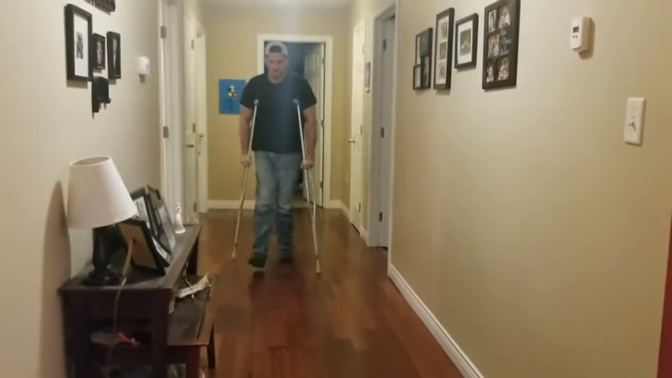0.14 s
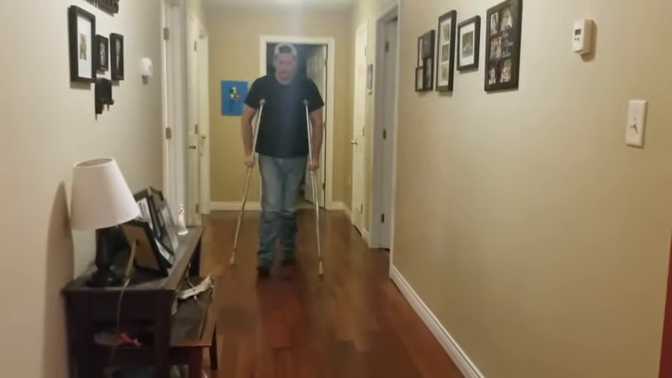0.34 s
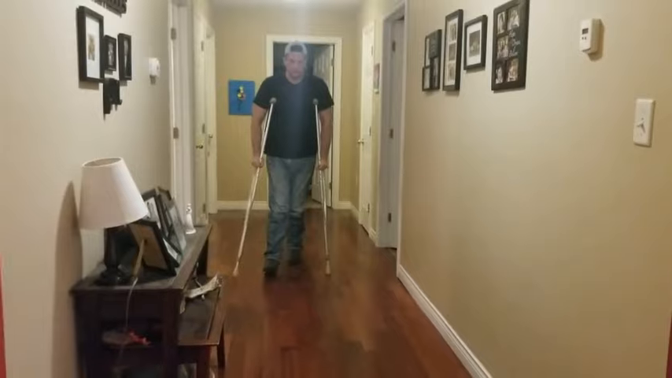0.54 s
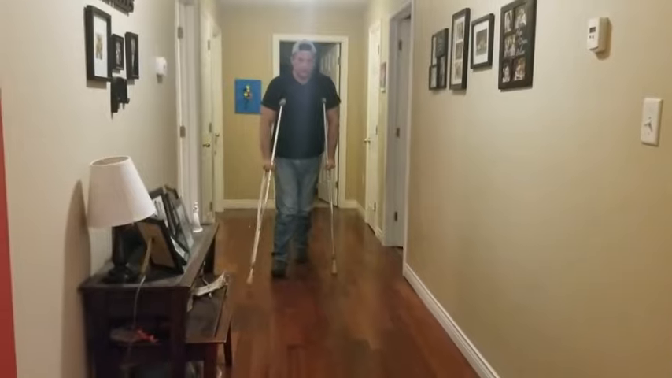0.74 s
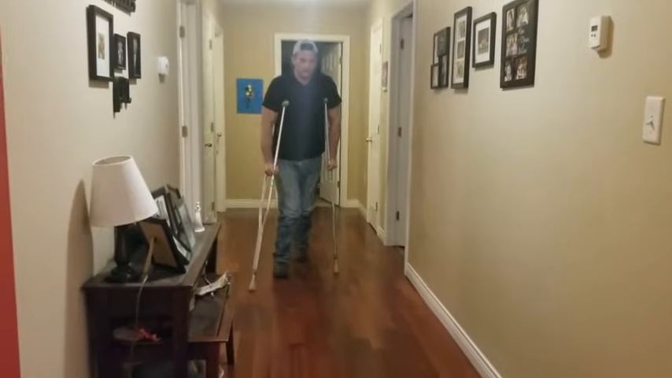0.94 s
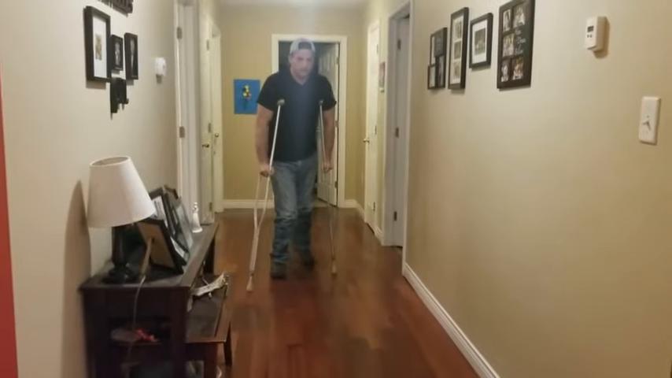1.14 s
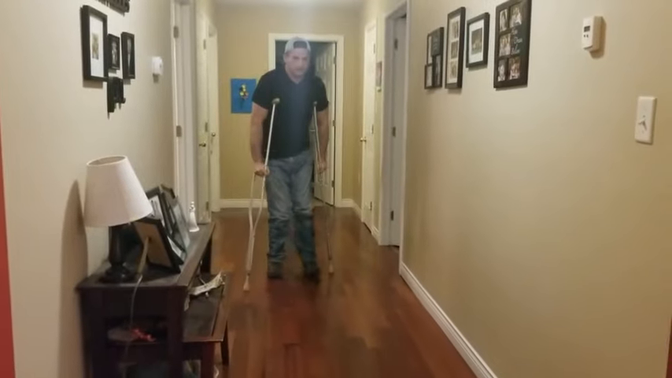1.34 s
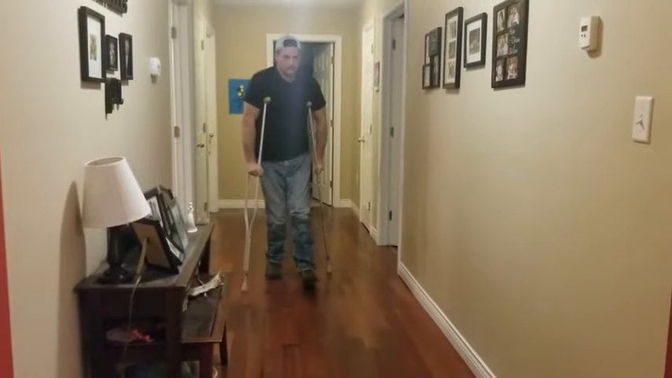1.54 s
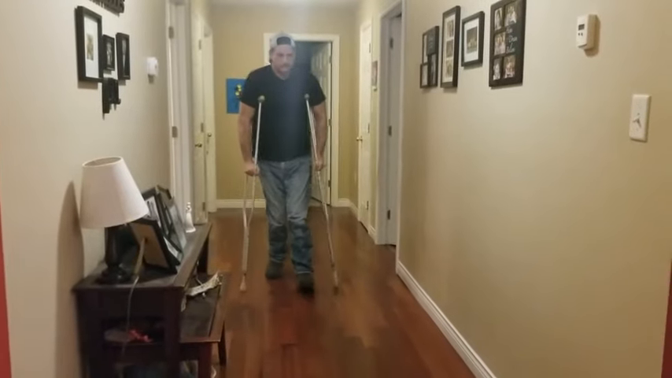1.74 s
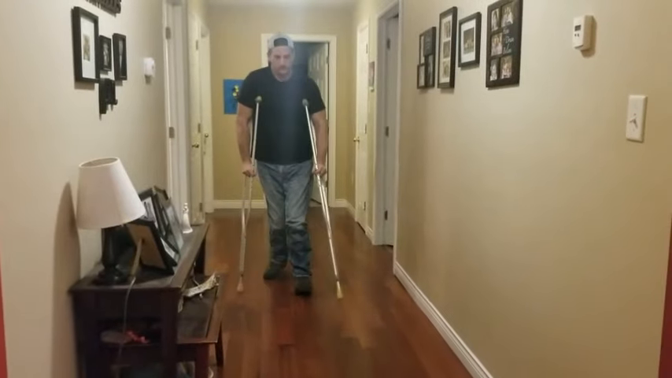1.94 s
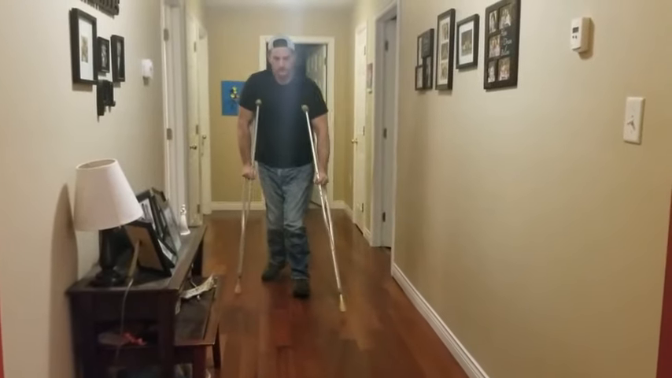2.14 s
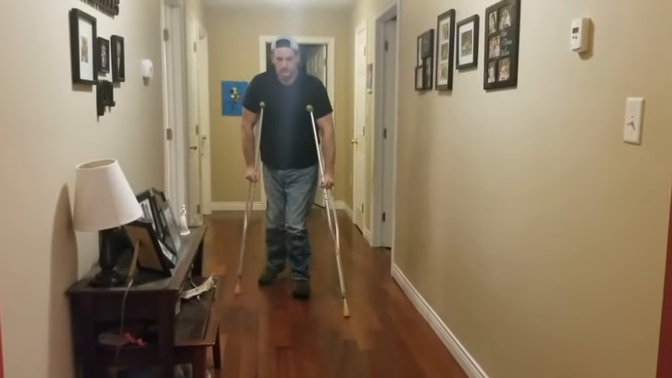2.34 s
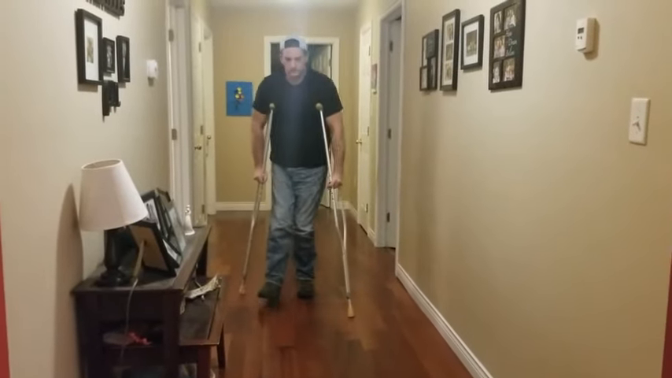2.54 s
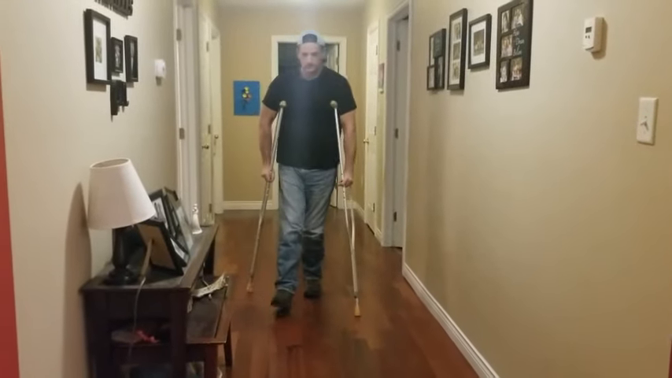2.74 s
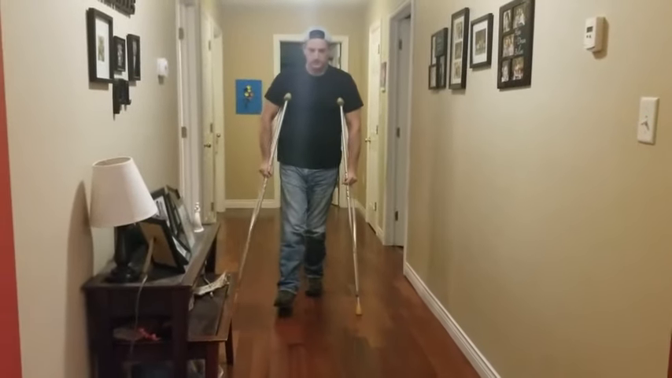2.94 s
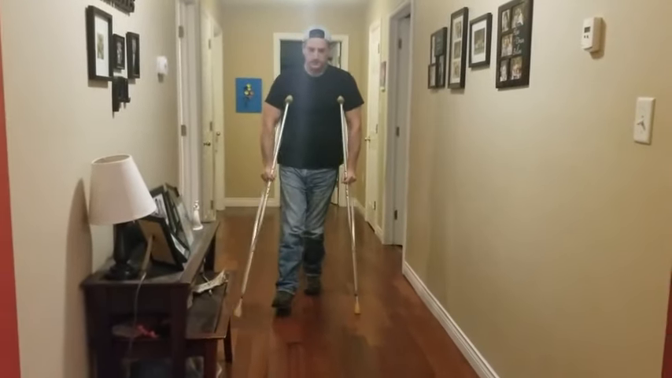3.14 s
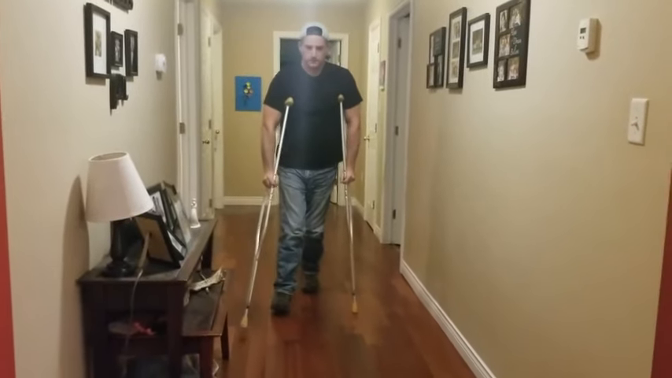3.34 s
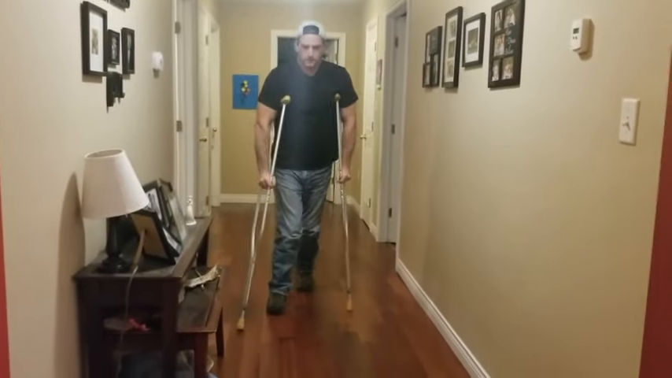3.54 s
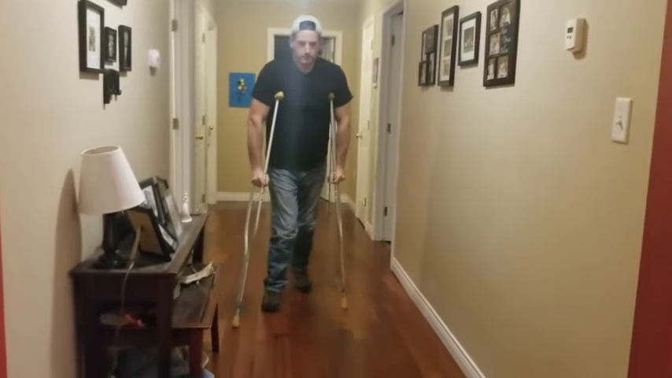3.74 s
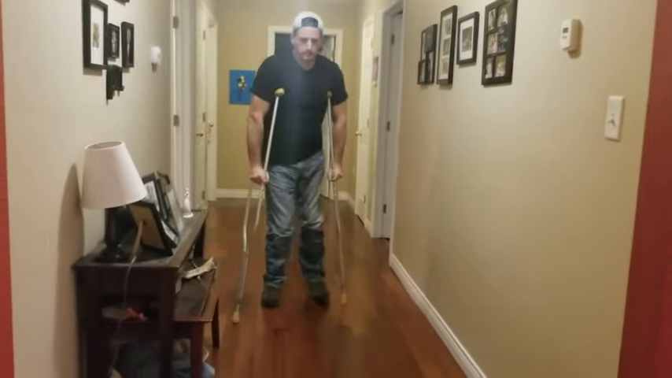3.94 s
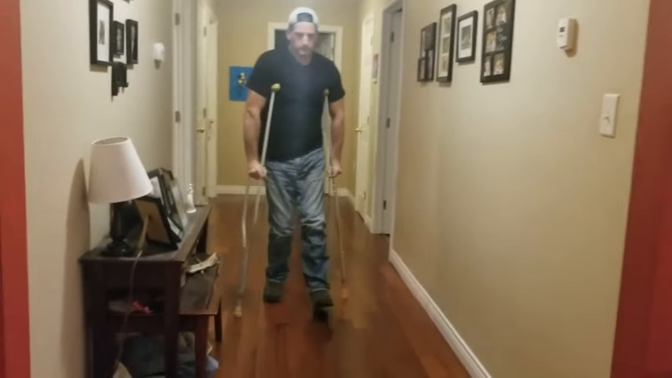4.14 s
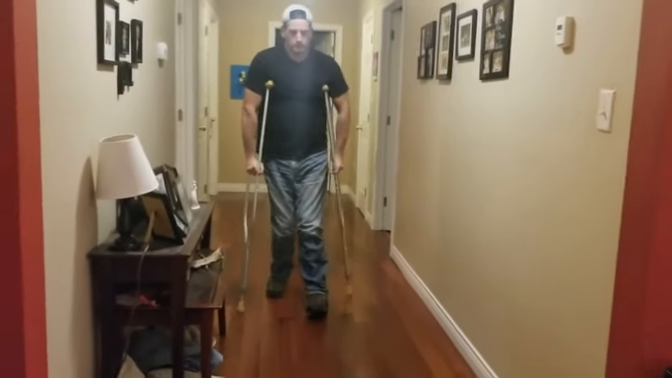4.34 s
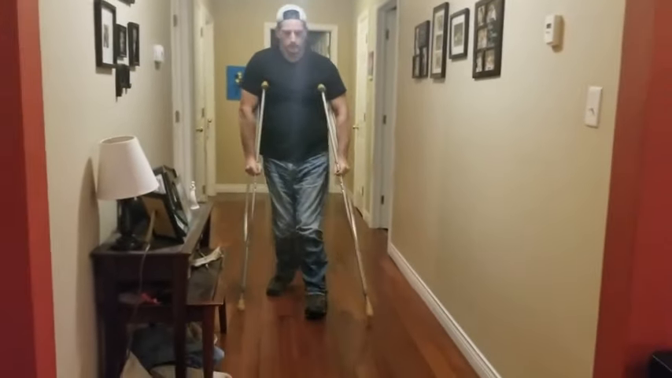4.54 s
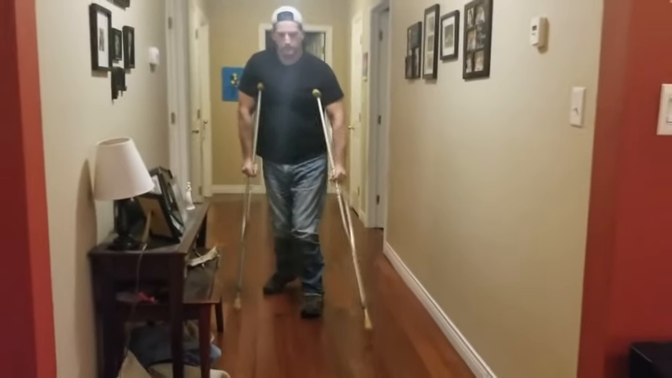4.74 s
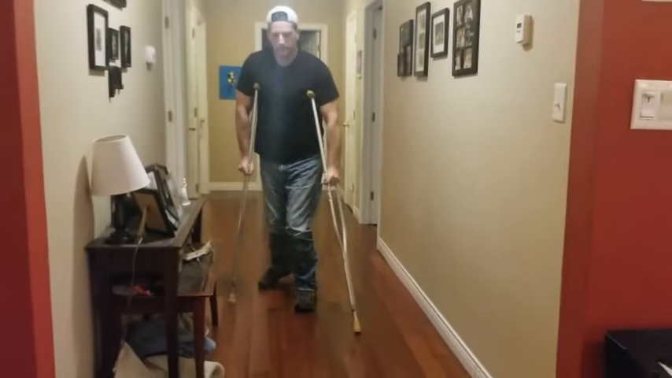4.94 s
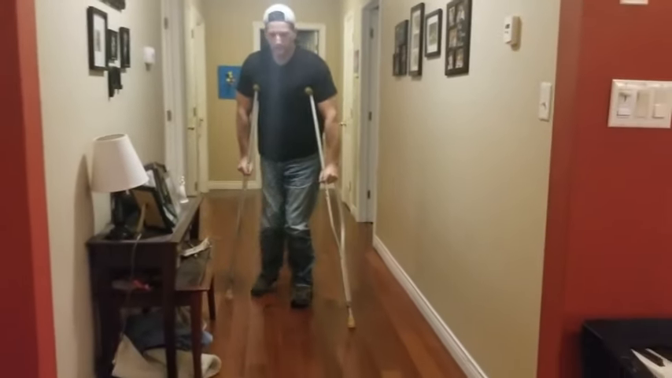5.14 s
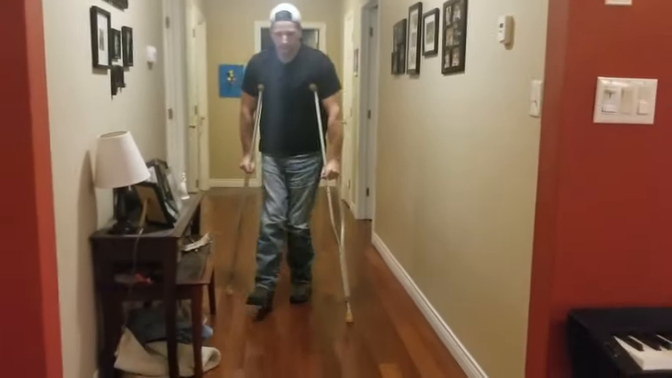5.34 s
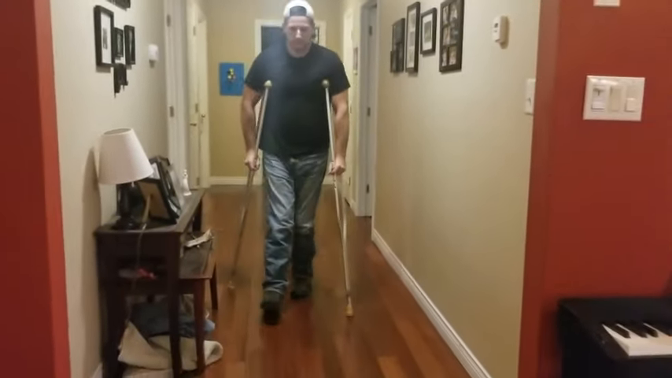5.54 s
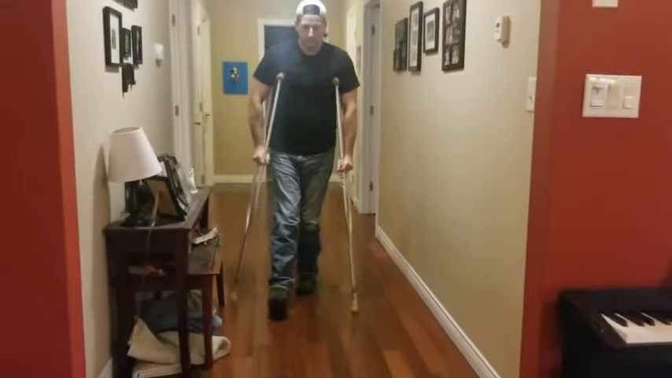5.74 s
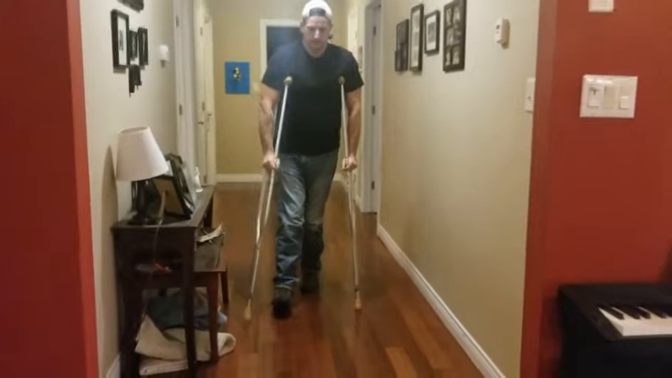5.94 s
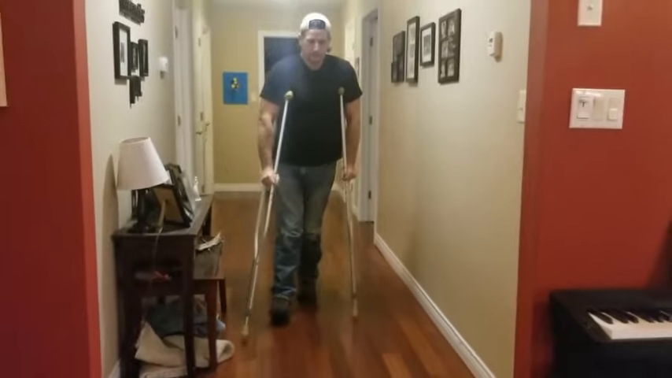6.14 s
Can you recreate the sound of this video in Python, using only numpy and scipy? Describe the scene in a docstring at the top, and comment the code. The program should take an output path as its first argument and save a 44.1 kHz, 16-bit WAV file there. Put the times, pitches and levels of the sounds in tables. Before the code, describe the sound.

Slow, uneven crutch steps indoors: sharp metallic joint clicks, soft board knocks, brief rubber creaks and light shoe scuffs, with quiet room hum behind.

```python
"""Slow steps on aluminium crutches in a narrow hardwood hallway: a joint click is dying away at the start.
A click and thud follow, then a rattling cluster of metal chatter and rasping creep of a loaded rubber tip.
Sparser snaps, soft touches, board thuds, near ticks and creeps come next; a sole scuffs past three seconds.
Near the end a hard click and thud lead to more clicks, thuds, creep and a last scuff. Bare walls add
reflections and a diffuse tail; a wavering far compressor tone and shaped noise run throughout, in stereo."""
import sys
import numpy as np
from scipy import signal
from scipy.fft import rfft, irfft, next_fast_len
from scipy.io import wavfile
from scipy.ndimage import map_coordinates

SR = 44100
rng = np.random.default_rng(int(sys.argv[2]) if len(sys.argv) > 2 else 0)


def waveform_to_disk(signal):
    """Save audio, clipped to [-1, 1], as 16-bit WAV at the path in sys.argv[1]."""
    frames = np.transpose(np.atleast_2d(signal))
    scaled = np.clip(frames, -1, 1) * 32767
    samples = np.round(scaled).astype(np.int16)
    wavfile.write(sys.argv[1], SR, samples)


N = 272979
SPAN = next_fast_len(SR)  # samples of one blow with its tail


# joints snapping shut: (t/s, direct peak level/dB, tube ring level/dB, ring f/Hz,
# sparkle level/dB, hallway level/dB)
JOINT_CLICKS = [(-.1, -20.5, -3.5, 1500, 1, 1), (0.2321, -33, -2.5, 2360, -5, 4),
                (0.2588, -12.5, -1, 1370, 1, 1), (0.7377, -31.5, -4, 2580, -12, 1),
                (0.766, -28.5, -2, 2170, -11, 0.5), (0.8064, -35.5, 5.5, 2200, -7, -1),
                (0.8584, -25.5, -3, 2150, -9, -2.5), (0.9059, -24.5, -2.5, 2300, -4, 5),
                (0.9184, -9, -6, 2410, 0, -2), (0.9417, -14, -1, 2360, 1, -5.5),
                (1.03, -21, -2, 2480, -0.5, -6), (1.048, -21, -2.5, 2260, -4, -5),
                (1.0656, -29, -4, 2420, -3, -5), (1.0841, -26.5, 0, 1190, -12, 2),
                (1.1044, -30.5, -7, 2160, 2, -6), (1.1326, -27.5, -2, 1323, -2, -5),
                (1.1658, -28.5, -6, 1230, -7, -2), (1.1893, -32, 6, 1200, 2.5, -3.5),
                (1.367, -37.5, -2, 1350, -11, 3.5), (1.4025, -20.5, -5.5, 2360, -1.5, -4),
                (1.6223, -22, -1.5, 1490, 5, -3.5), (2.2192, -11.5, -2, 2043, 4.5, 3),
                (2.4451, -28.5, 1.5, 2750, -2, 1), (2.5296, -22, -3, 2790, 4.5, 0),
                (2.7455, -22.5, -6, 1452, 3.5, 1), (2.8883, -36.5, 5, 2392, -3, -2),
                (3.0497, -35.5, -8, 2660, -19, -3), (3.455, -14.5, -8, 2256, 2, 0.5),
                (3.4814, -22.5, 0.5, 2110, -10, 0), (3.5934, -23.5, -1, 2480, 3.5, -4),
                (3.8295, -21, -7.5, 2310, -8.5, -5), (3.8446, -20.5, -2.5, 1310, -3, -3),
                (4.0617, -34.5, 1.5, 1280, -5, 1), (4.2502, -43, 5, 1180, 3, 5),
                (4.3302, -26, -2.5, 1520, 6.5, -2), (4.3975, -34.5, -17, 1610, -16, -2),
                (4.9049, -10, 1.5, 1493, 5, 3), (5.1715, -30.5, 1, 2720, 1.5, 1.5),
                (5.514, -33.5, 3.5, 1355, 4.5, 2), (5.5394, -20, -4.5, 1920, 5, 0.5)]
# first touches, a few ms before a joint snaps shut: (t/s, direct peak level/dB)
FIRST_TOUCHES = [(1.617, -36), (2.738, -32), (4.324, -35), (5.533, -27.5)]
# character of every touch: (tube ring level/dB, ring f/Hz, sparkle level/dB, hallway level/dB)
TOUCH_TONE = (-2.5, 2296, 2, -2.5)
# basic colour of a click: (f/Hz, relative level/dB)
CLICK_COLOUR = [(290, -51), (500, -4), (632, -6.5), (710, -2), (952, 0), (1520, 0.5), (2850, 0.5),
                (3300, -5.5), (4420, 3), (6760, 3), (8930, -15), (11400, -6.5), (14300, -13),
                (15800, -23.5), (16500, -40)]
# fixed modes of the crutch tube: (f/Hz, width/Hz, relative level/dB)
TUBE_MODES = [(1217, 32, -6.5), (1523, 71, -7.5), (4300, 71, -18), (6480, 210, -8)]
# click treble beaming along the hallway: (f/Hz, level/dB)
TREBLE_BEAM = [(800, -4), (3000, -1), (12000, 2)]
# where the crutches stand: (t/s, left-right level/dB)
CRUTCH_BEARING = [(0, 8), (1, 0.5), (2.2, -5.5), (5, -3), (6, 0)]
SWAY_DB = 1  # random scatter of each click about the bearing
BURST_S, BURST_S_PER_DB, USUAL_DB = .013, .0002, -22  # a harder click chatters longer than a usual one
TOUCH_S = 0.02  # chatter time of a touch
WOOD_DB = -6.5  # what a click passes to the boards, against the ring of the tube
TUBE_GAIN = 1.23  # resonance against the plain snap


def crutches():
    """Play in the joints snaps shut: a few ms of metal chatter excite resonances of the tube."""
    out = np.zeros((2, N + 2 * SR))
    snaps = [(*row, BURST_S + BURST_S_PER_DB * (row[1] - USUAL_DB)) for row in JOINT_CLICKS]
    touches = [(s, db, *TOUCH_TONE, TOUCH_S) for s, db in FIRST_TOUCHES]
    room = tails(count=9)
    for k, (s, db, ring_db, ring_hz, sparkle_db, wet_db, burst) in enumerate(snaps + touches):
        shelf = [(750, ring_db + WOOD_DB), (1200, ring_db), (2800, ring_db),
                 (3800, 0), (7500, 0), (9500, sparkle_db)]
        tube = [(ring_hz, 150, 0), *TUBE_MODES]  # one mode shifts with grip and load

        def colour(f):
            """Broad snap colour with the tube ringing on top."""
            snap = causal(amp(along(CLICK_COLOUR, f) + along(shelf, f)))
            return snap * (1 + TUBE_GAIN * modes(tube, f))

        even = filtered(np.eye(1, 4096)[0], colour)  # the same colour without the beam
        direct = filtered(burst_pair(burst), lambda f: colour(f) * causal(amp(along(TREBLE_BEAM, f))))
        direct, even = peaked(direct, even)
        pan_db = np.interp(s, *np.transpose(CRUTCH_BEARING)) + SWAY_DB * rng.standard_normal()
        add(out, amp(db) * hallway(direct, even, room[k % len(room)], wet_db, pan_db), s)
    return out[:, SR:SR + N]


# thuds on the boards: (t/s, direct peak level/dB, joist boom level/dB, edge level/dB)
BOARD_THUDS = [(0.23, -30.5, -11, -9), (0.259, -36.5, -2, 12), (0.874, -46, -16, 5), (0.915, -29, -18, -8),
               (1.558, -40.5, -10, -8), (1.59, -47, -5, -8), (1.91, -52, -13, -3),
               (2.215, -29.5, -20.5, -14.5), (2.249, -32, -28, 2), (2.78, -28.5, -10, -2.5),
               (2.804, -35.5, -8, 4), (3.456, -35.5, -14.5, -6.5), (4.181, -49, 5, -3),
               (4.247, -36, -1.5, 1.5), (4.274, -42, -1, 2), (4.36, -47.5, 2, -2), (4.9035, -27, -17.5, -3),
               (4.939, -28, -30, 2), (5.385, -49, -2.5, -20), (5.514, -32, -13.5, -10),
               (5.549, -34, -14, 0.5), (5.68, -47, 6, -8), (5.802, -42, 3, -12), (5.868, -41.5, 2, 8)]
# floor modes: (f/Hz, width/Hz, relative level/dB)
BOARD_MODES = [(180, 62, -13.5), (259.9, 25, 3.5), (317.7, 29, -3), (422, 47, -13)]
# boom of the floor frame: (f/Hz, width/Hz)
JOIST_MODE = (120, 142)
CONTACT_S = 0.0007  # time for the push of rubber on wood to peak
THUD_WET_DB = -1  # the hallway's answer
RADIATES_HZ = 150  # the boards move little air below this


def footfalls():
    """A rubber tip or heel pushes the boards once; board and joist resonances shape the knock."""
    out = np.zeros((2, N + 2 * SR))
    u = np.arange(8192) / SR / CONTACT_S
    push = u * np.exp(-u)
    room = tails(count=5)
    for k, (s, db, boom_db, edge_db) in enumerate(BOARD_THUDS):

        def floor(f):
            """Boards through their weak bass radiation, plus the joists."""
            bare_push_and_edge = [(268, 210, -11.5), (783, 450, edge_db)]
            boards = modes(BOARD_MODES, f) + modes(bare_push_and_edge, f)
            radiation = (1j * f / (RADIATES_HZ + 1j * f)) ** 2
            return boards * radiation + modes([(*JOIST_MODE, boom_db)], f)

        knock, = peaked(filtered(push, floor))
        add(out, amp(db) * hallway(knock[None], knock, room[k % len(room)], THUD_WET_DB, 0), s)
    return out[:, SR:SR + N]


# a loaded rubber tip creeps on the varnish: (start t/s, let-go t/s, starting rasp level/dB, rasp f/Hz,
# starting hiss level/dB, fade/dB per s)
TIP_CREEPS = [(1.072, 1.4, -51, 1286, -49.5, 45), (1.643, 2.028, -60.5, 1470, -54, 23),
              (2.797, 2.992, -61, 1437, -53, 80), (3.86, 4.18, -49, 1332, -51, 80),
              (4.349, 4.52, -50, 1470, -52, 170), (5.594, 5.88, -62, 1455, -55.5, 11)]
# hiss of rubber on varnish: (f/Hz, relative level/dB)
VARNISH_HISS = [(700, -36), (1100, -5), (2400, 0), (3300, -4.5), (5000, -2), (7000, -8.5), (8500, -22),
                (12000, -16), (16000, -50)]
LET_GO_DB_S = 250  # extra fall, dB per s, once the load lifts


def creep():
    """Uneven slips of rubber: a narrow rasp, an overtone and a grainy hiss, fading as the tip settles."""
    out, t = np.zeros((2, N)), np.arange(N) / SR
    narrow = signal.butter(2, 150, fs=SR, output="sos")
    hiss = noise(VARNISH_HISS) * amp(2.0 * waver(70))
    slips = unit(signal.sosfilt(narrow, rng.standard_normal((4, 2, N))))
    for start, end, rasp_db, hz, hiss_db, fade_db in TIP_CREEPS:
        on = slice(int(start * SR), int((end + .5) * SR))
        a, b, c, d = slips[..., on]
        phase = 2 * np.pi * hz * t[on]
        over = 1.75 * phase
        # slow noises on cosine and sine make a narrow band around each pitch
        rasp = a * np.cos(phase) + b * np.sin(phase)
        rasp = rasp + .5 * (c * np.cos(over) + d * np.sin(over))
        load = amp(-fade_db * (t[on] - start) - LET_GO_DB_S * np.maximum(t[on] - end, 0))
        out[:, on] += load * (amp(rasp_db) * rasp + amp(hiss_db) * hiss[:, on])
    return out


# soles rolling and sliding: (full from t/s, until t/s, held level/dB)
SOLE_SCUFFS = [(3.304, 3.452, -59.5), (5.624, 5.87, -58)]
# rustle of a sole: (f/Hz, relative level/dB)
SOLE_COLOUR = [(88, -42), (170, -20), (350, -2.5), (600, -10), (900, -29), (1500, -35), (3300, -90)]
SCUFF_RISE_DB_S, SCUFF_FALL_DB_S = 120, 130  # dB per s


def soles():
    """A sole rolling over the boards: low noise that swells, holds and fades."""
    t = np.arange(N) / SR
    gain = 0
    for full, until, db in SOLE_SCUFFS:
        rise_db = SCUFF_RISE_DB_S * np.maximum(full - t, 0)
        fall_db = SCUFF_FALL_DB_S * np.maximum(t - until, 0)
        gain = gain + amp(db - rise_db - fall_db)
    return gain * noise(SOLE_COLOUR)


# small dry ticks: (t/s, direct peak level/dB, centre f/Hz, left-right level/dB)
NEAR_TICKS = [(3.2583, -39, 9600, -13.5), (4.0872, -32.5, 2080, -14), (4.125, -43.5, 6200, -12),
              (4.1847, -46.5, 2710, 15), (4.563, -48, 2300, -16), (5.389, -46, 2910, 7),
              (5.4856, -44, 5350, 0)]
TICK_WIDTH, TICK_S, TICK_WET_DB = 0.68, 0.0075, -11  # mode width over centre, chatter time, hallway's answer


def ticks():
    """Short chatter through one broad resonance applied twice, so near that the hallway barely answers."""
    out = np.zeros((2, N + 2 * SR))
    room, = tails(count=1)
    for s, db, hz, pan_db in NEAR_TICKS:
        colour = lambda f: modes([(hz, TICK_WIDTH * hz, 0)], f) ** 2
        even = filtered(np.eye(1, 4096)[0], colour)
        direct, even = peaked(filtered(burst_pair(TICK_S), colour), even)
        add(out, amp(db) * hallway(direct, even, room, TICK_WET_DB, pan_db), s)
    return out[:, SR:SR + N]


# far compressor tone: (t/s, f/Hz, level before waver/dB)
COMPRESSOR = [(0, 86.2, -59), (.6, 85.5, -60.5), (1.6, 86, -57), (3.5, 86.4, -60.5), (4.5, 85.6, -56.5),
              (5, 85.2, -56), (5.85, 85.3, -53), (6.19, 85.3, -55.5)]


def hum():
    """A far compressor drone: one sine drifting in pitch and level, offset in phase between the sides."""
    s, hz, db = np.transpose(COMPRESSOR)
    t = np.arange(N) / SR
    phase = 2 * np.pi * np.cumsum(np.interp(t, s, hz)) / SR
    level = amp(np.interp(t, s, db) + 1.6 * waver(6.5))
    return np.sqrt(2) * level * np.sin(phase + np.array([[.3], [-.3]]))


# house and microphone noise: (f/Hz, relative level/dB)
HOUSE_COLOUR = [(15, -35), (30, -15), (60, 4), (120, -4.5), (200, -12.5), (300, -10), (480, -14.5),
                (787, -29), (1880, -17), (3200, -19), (6000, -11.5), (8370, -28.5), (12000, -17),
                (15500, -22.5), (16000, -58)]
QUIET_DB = -61  # level about which it wavers


def house():
    """House and microphone noise: a shaped stereo bed with a slightly wavering level."""
    return amp(QUIET_DB + 0.32 * waver(4.09)) * noise(HOUSE_COLOUR)


# first reflections: (nominal t/s, level/dB)
WALL_ECHOES = [(.009, -9.5), (.013, -13), (.023, -11.5), (0.029, -10.5)]


def hallway(dry, even, tail, wet_db, pan_db):
    """A blow direct and off near walls; its diffuse tail gathers all directions, so its colour is even."""
    early = np.zeros((2, 2048))
    early[:, 0] = amp([pan_db / 2, -pan_db / 2])  # the direct sound
    for s, db in WALL_ECHOES:
        delay = int(SR * s * rng.uniform(.85, 1.15))
        early[:, delay] += amp(db + wet_db + rng.normal(0, 0.53, 2))
    direct_and_walls = rfft(dry, SPAN) * rfft(early, SPAN)
    diffuse = amp(wet_db) * rfft(even, SPAN) * tail
    return irfft(direct_and_walls + diffuse, SPAN)


# decay of the nearer hallway tail: (f/Hz, time to fall 60 dB t/s)
HALL_DECAY = [(100, 0.31), (250, 0.42), (600, 0.71), (1500, 0.56), (3000, 0.66), (6000, 0.49),
              (12000, 0.41)]
TAIL_S, TAIL_DB, GATHER_S = .7, -29.5, 0.0045  # length, gain and build-up of the diffuse tail
FAR_DB, FAR_RATE = -23.5, 0.44  # weaker tail of the rooms beyond; its decay rate against the hallway's


def tails(count):
    """Spectra of diffuse stereo tails: noise whose bands decay at their own rates, with a slower far part."""
    n = int(TAIL_S * SR)
    hz, t, z = signal.stft(rng.standard_normal((count, 2, n)), SR, nperseg=256)
    fall_db = -60 * t / along(HALL_DECAY, hz)[:, None]
    fade = amp(fall_db) + amp(FAR_DB + FAR_RATE * fall_db)
    pair = signal.istft(z * paired(hz)[:, :, None] * fade, SR, nperseg=256)[1][..., :n]
    pair = pair * np.clip(np.arange(n) / SR / GATHER_S, 0, 1)
    mid, side = pair[:, 0], pair[:, 1]
    return rfft(np.stack([mid + side, mid - side], axis=1) * amp(TAIL_DB), SPAN)


# likeness of the two microphone ports: (f/Hz, left-right correlation)
PORT_LIKENESS = [(30, 0.59), (100, 1), (300, 0.68), (600, 0.5), (1200, 0.13), (16000, -0.16)]


def paired(hz):
    """Mid and side gains that give the likeness of the two ports."""
    turn = np.arccos(np.clip(along(PORT_LIKENESS, hz), -1, 1)) / 2
    return np.array([np.cos(turn), np.sin(turn)])


def noise(spectrum):
    """Shaped stereo noise of rms 1."""
    shape = lambda hz: amp(along(spectrum, hz)) * paired(hz)
    mid, side = filtered(rng.standard_normal((2, N)), shape)
    return unit(np.array([mid + side, mid - side]))


def burst_pair(burst):
    """A noisy contact falling 60 dB per burst time, energy 1 on each side, only partly alike."""
    t = np.arange(4096) / SR
    shared, own = rng.standard_normal(len(t)), rng.standard_normal((2, len(t)))
    u = t / max(burst, .001)
    chatter = (0.68 * shared + own) * amp(-60 * u) * (1 - np.exp(-u / 0.24))
    return chatter / np.linalg.norm(chatter, axis=1, keepdims=True)


def modes(table, f):
    """A sum of resonances of alternating sign."""
    return sum((-1) ** k * amp(db) * 1j * f * w / (c * c - f * f + 1j * f * w)
               for k, (c, w, db) in enumerate(table))


def causal(gain):
    """The minimum-phase response of this gain, which never sounds before its cause."""
    c = irfft(np.log(gain + 1e-6))
    c[1:len(c) // 2] *= 2  # fold the cepstrum onto positive time
    c[len(c) // 2 + 1:] = 0
    return np.exp(rfft(c))


def filtered(x, response):
    """x times a complex response of frequency."""
    m = next_fast_len(x.shape[-1] + 8192)
    return irfft(rfft(x, m) * response(np.fft.rfftfreq(m, 1 / SR)), m)[..., :x.shape[-1]]


def along(points, hz):
    """(f/Hz, value) points interpolated on a log frequency axis."""
    f, v = np.transpose(points)
    return np.interp(np.log(hz + 1), np.log(f + 1), v)


def waver(rate):
    """A smooth random curve, rate knots a second."""
    knots = rng.standard_normal(int(N * rate / SR) + 4)
    return map_coordinates(knots, [np.arange(N) * rate / SR])


def amp(db):
    """dB to gain."""
    return 10 ** (np.asarray(db) / 20)


def unit(x):
    """x at rms 1."""
    return x / np.sqrt(np.mean(x ** 2) + 1e-20)


def peaked(dry, *others):
    """dry at peak 1, and the others scaled alike."""
    return [x / np.abs(dry).max() for x in (dry, *others)]


def add(out, sound, s):
    """Mix a sound in at s seconds; out starts one second early."""
    out[:, round((s + 1) * SR):][:, :sound.shape[1]] += sound


def scene():
    """Everything in the hallway."""
    background = house()
    return crutches() + ticks() + footfalls() + soles() + creep() + hum() + background


# tilt between the two microphone ports: (f/Hz, left-right level/dB)
PORT_TILT = [(60, -2.5), (150, -0.5), (380, -2.0), (950, 0.0), (2380, 0.5), (5980, -2), (15000, -7)]
TOP_HZ = 16800  # nothing passes from here up


def record(dry):
    """Two unequal microphone ports, then the band limit."""
    def ports(hz):
        """Half the tilt on each side, below the top frequency."""
        return amp(np.outer([.5, -.5], along(PORT_TILT, hz))) * (hz < TOP_HZ)
    return filtered(dry, ports)


dry = scene()
out = record(dry)
waveform_to_disk(out)
```